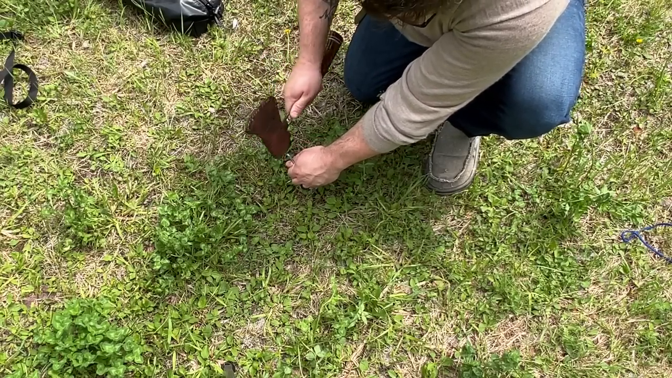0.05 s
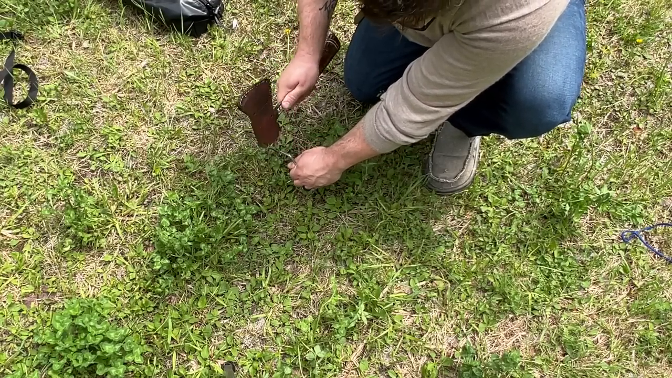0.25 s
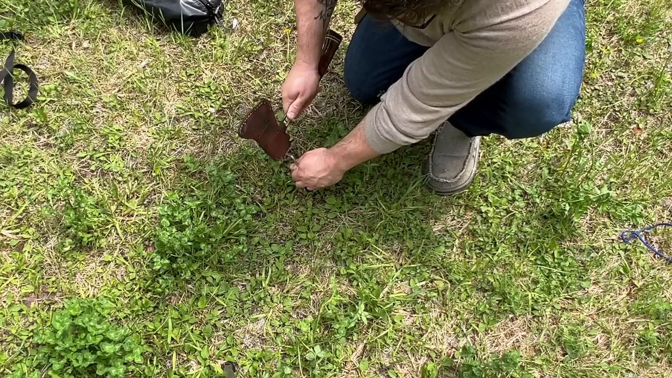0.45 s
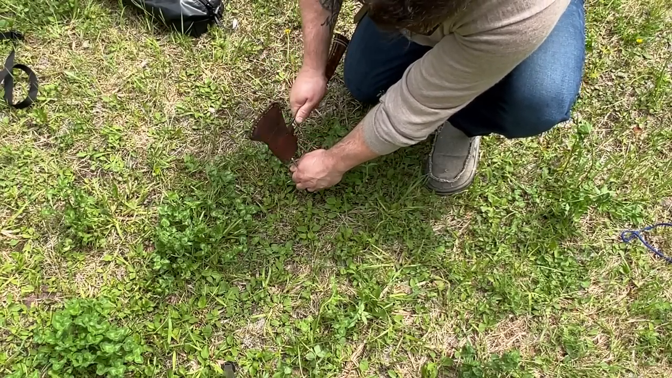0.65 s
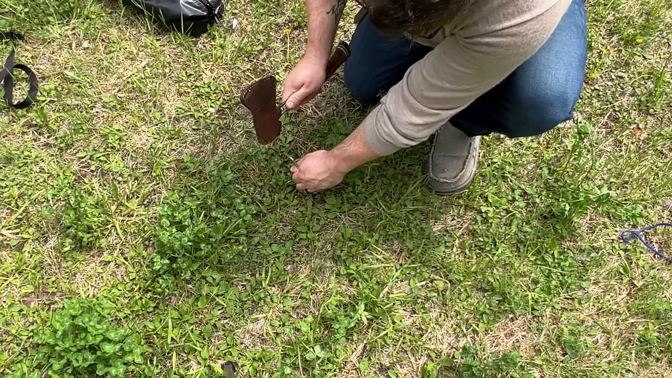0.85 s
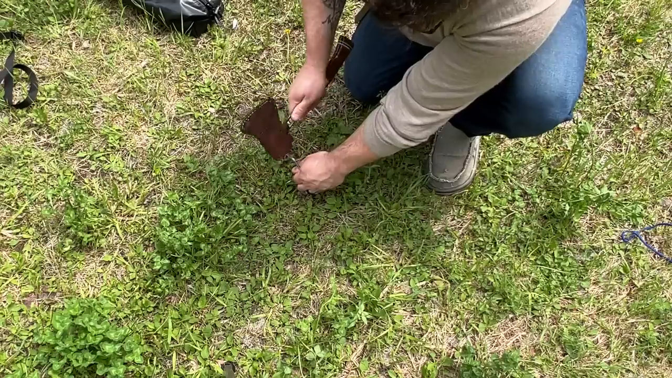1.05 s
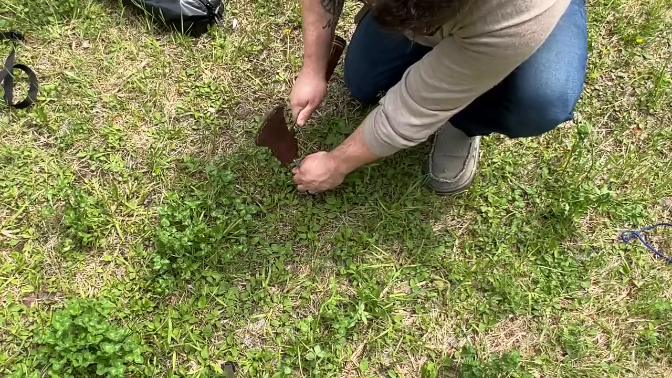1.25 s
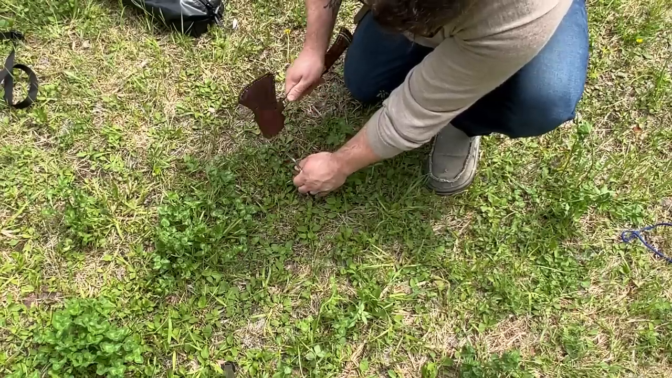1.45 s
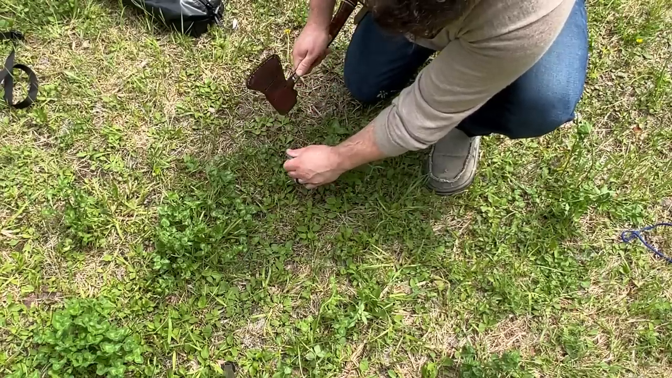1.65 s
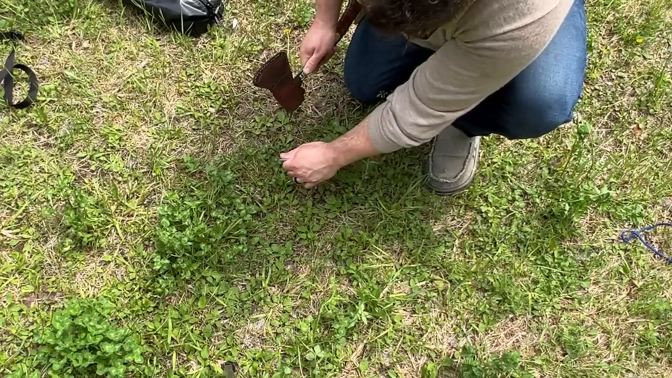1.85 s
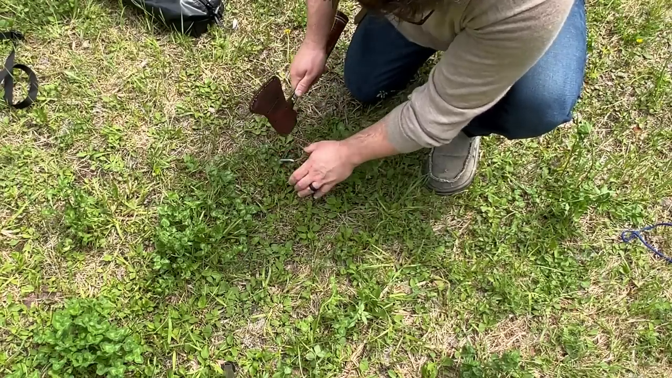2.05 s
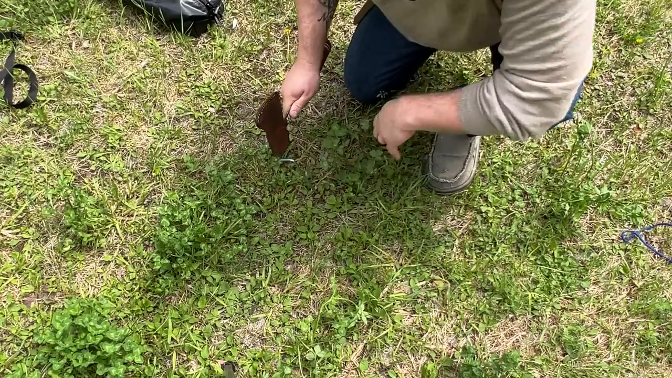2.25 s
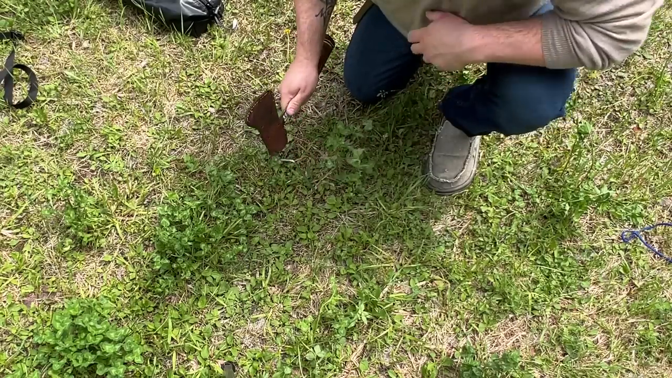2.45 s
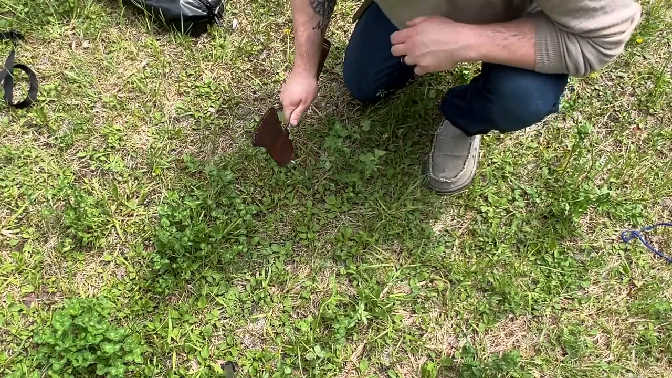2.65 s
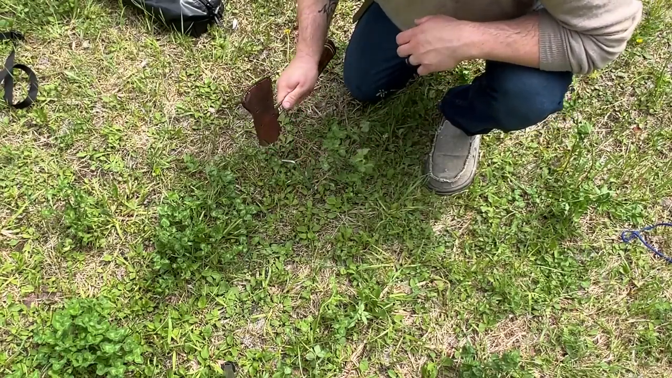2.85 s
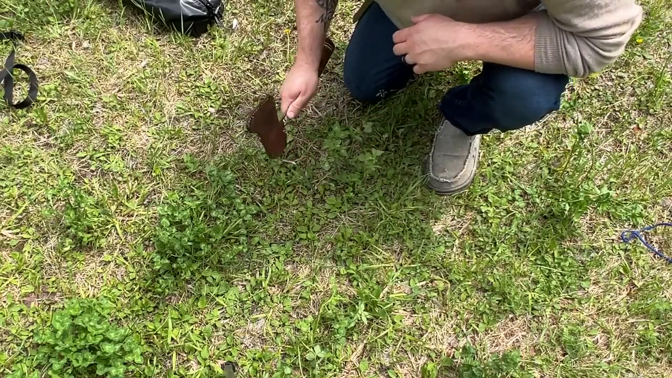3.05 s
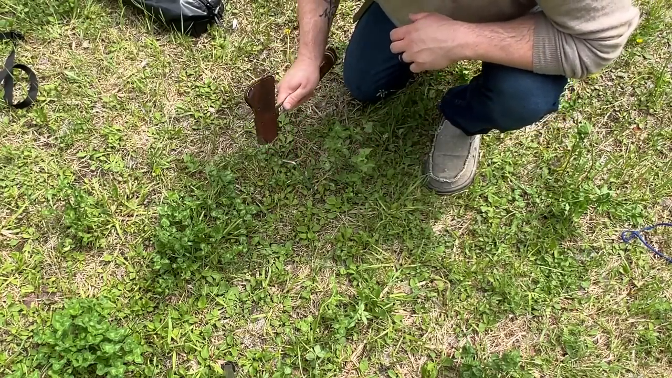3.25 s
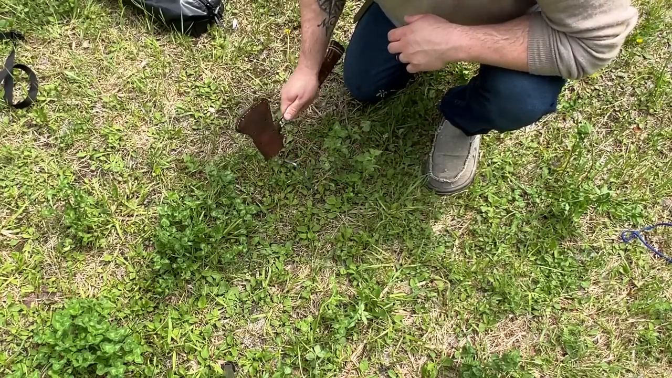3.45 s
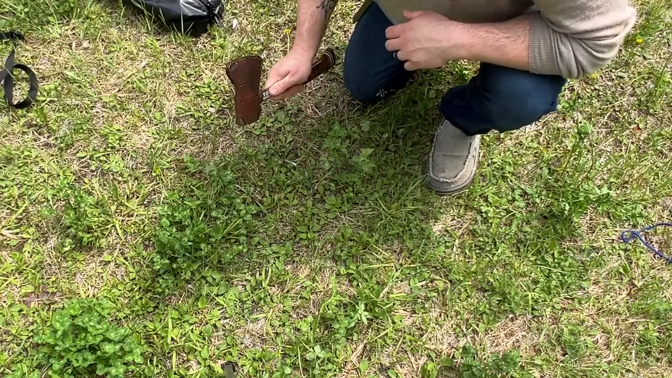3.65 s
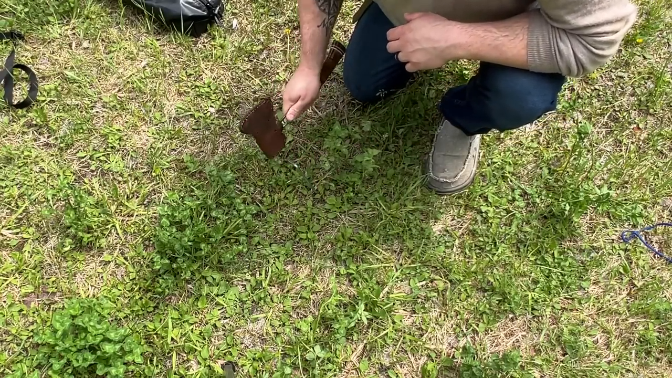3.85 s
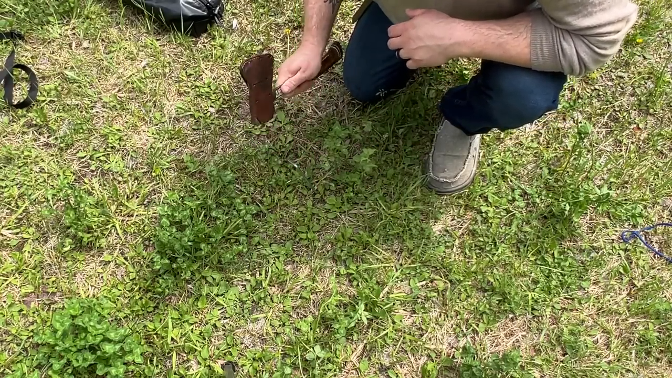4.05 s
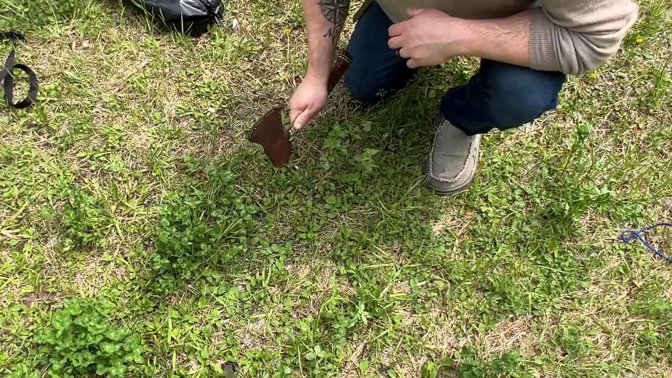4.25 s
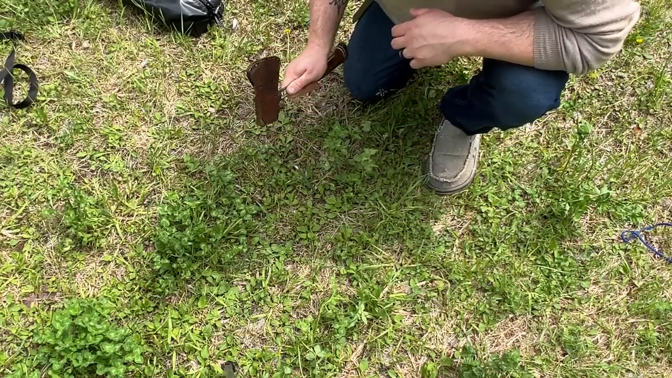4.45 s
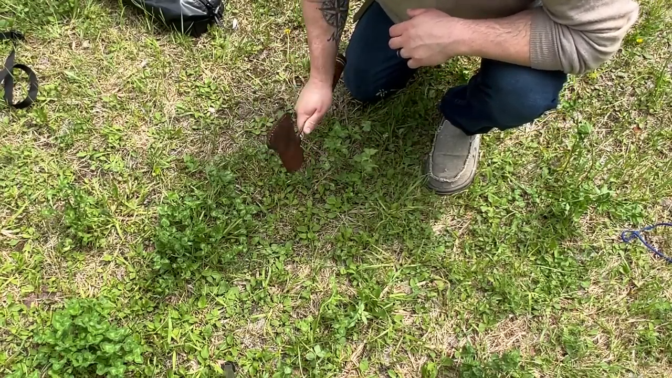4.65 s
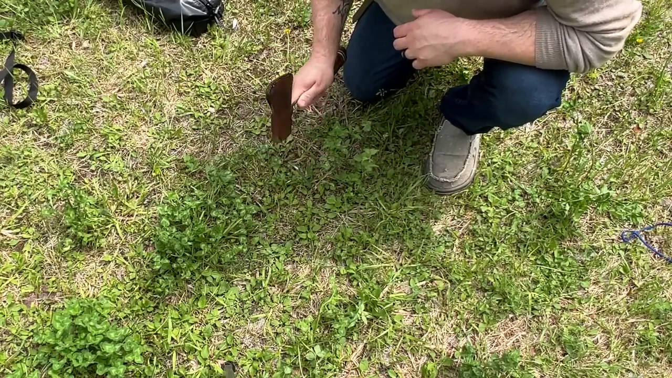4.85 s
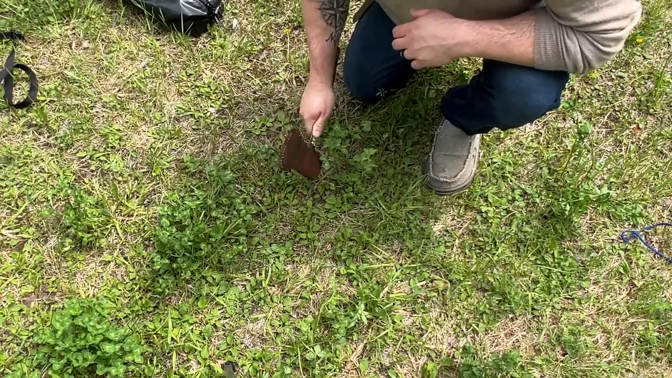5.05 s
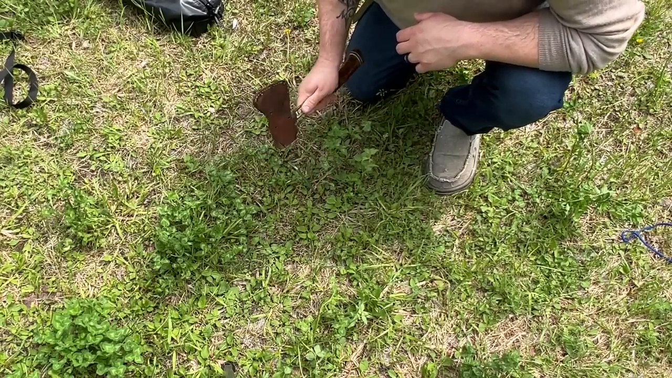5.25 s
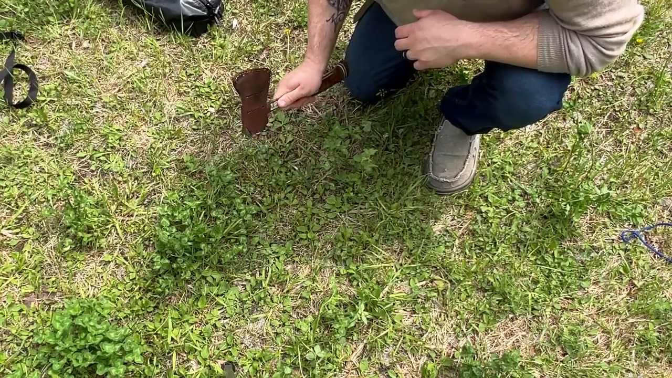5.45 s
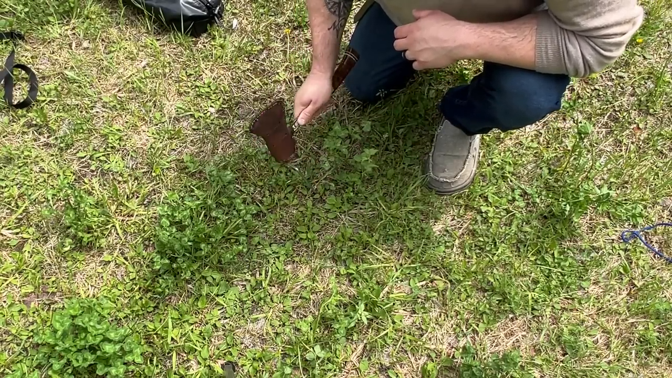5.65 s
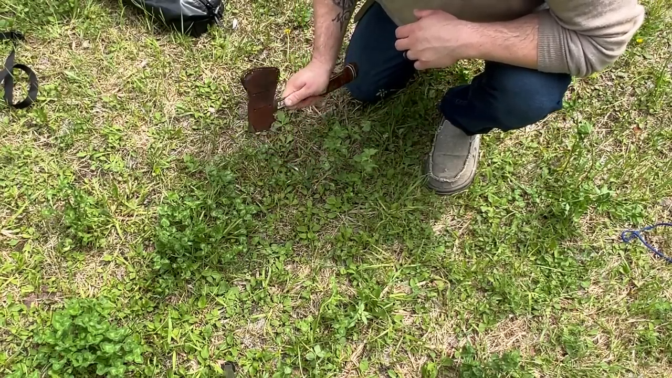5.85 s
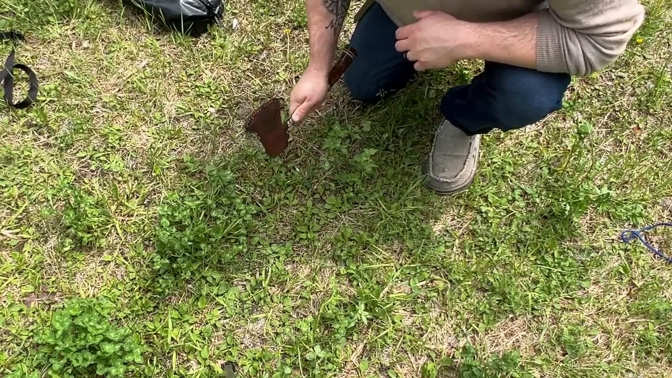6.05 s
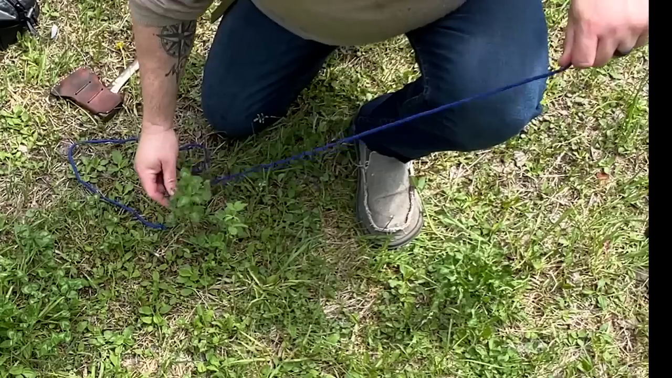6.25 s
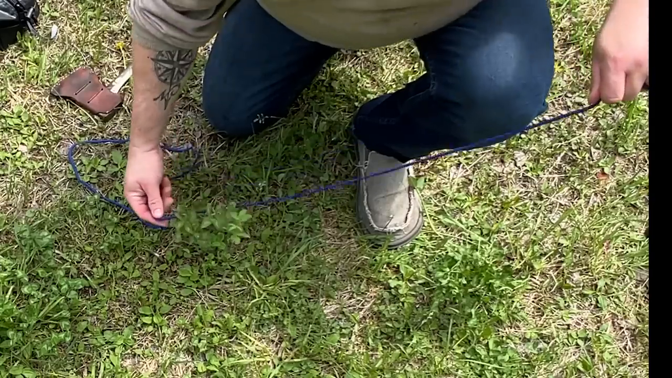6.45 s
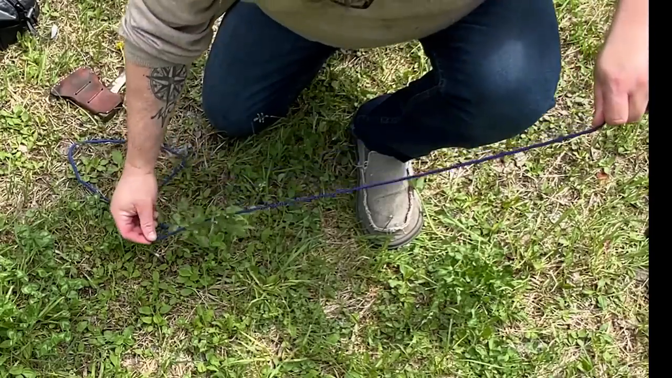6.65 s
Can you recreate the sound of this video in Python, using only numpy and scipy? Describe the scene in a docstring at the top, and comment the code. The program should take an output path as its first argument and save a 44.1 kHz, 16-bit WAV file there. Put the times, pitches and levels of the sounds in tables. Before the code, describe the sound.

A hatchet hammers a metal tent stake into a lawn with sharp clanks and thuds, over wind rumble and a distant whistling bird.

```python
"""Over open air and a gusty breeze rumbling on the microphone, a hatchet drives a metal tent stake into a lawn.
Five blows land while a far bird whistles: each a short clank of chattering steel and a falling thud from the
soil, with a faint wash from the campsite. In a pause the hand lets go of the stake, the bird calls again and a
sleeve brushes past. Ten more blows follow, firmer as the stake sinks; once the hatchet drops back with a tiny
tick. After the last blow the background suddenly turns duller."""
import sys
import numpy as np
from scipy import signal
from scipy.fft import rfft, irfft, next_fast_len
from scipy.io import wavfile
from scipy.ndimage import uniform_filter1d

SR = 44100
rng = np.random.default_rng(int(sys.argv[2]) if len(sys.argv) > 2 else 0)


def int16_out(signal):
    """Quantize to a 16-bit WAV file."""
    q = np.round(np.clip(np.atleast_2d(signal).T, -1, 1) * 32767)
    wavfile.write(sys.argv[1], SR, q.astype(np.int16))


N = 295470
TIME = np.arange(N) / SR
BLOW_TIME = TIME[:2400]


def from_db(db):
    """Decibels to gain."""
    return 10 ** (np.asarray(db) / 20)


def rms_one(x):
    """Scale to rms 1."""
    return x / np.sqrt(np.mean(x ** 2) + 1e-20)


def at_level(x, db):
    """Give each short sound the energy of 10 ms at this level; a stereo pair is scaled as one."""
    energy = np.sum(x ** 2, axis=-1, keepdims=True)
    energy = energy.mean(axis=0) if x.ndim > 1 else energy
    return x * from_db(db) * np.sqrt(SR / 100 / (energy + 1e-20))


def at_hz(points, hz, column=1):
    """Read a table on a log-frequency axis."""
    points = np.array(points)
    return np.interp(np.log(hz), np.log(points[:, 0]), points[:, column])


def band(x, low, high):
    """Causal band-pass, edges in Hz."""
    edges = [max(low, 10), min(high, .48 * SR)]
    return signal.sosfilt(signal.butter(2, edges, "band", fs=SR, output="sos"), x)


def resonate(x, hz, width):
    """Two-pole resonance, gain 1 at its peak."""
    r = np.exp(-np.pi * width / SR)
    feedback = [1, -2 * r * np.cos(2 * np.pi * hz / SR), r * r]
    return signal.lfilter((1 - r * r) / 2 * np.array([1, 0, -1]), feedback, x)


def stereo(pair, correlation):
    """Mix two unrelated sounds as mid and side into left and right of a given correlation."""
    mid, side = np.sqrt(1 + correlation) * pair[0], np.sqrt(1 - correlation) * pair[1]
    return np.array([mid + side, mid - side])


# Stereo image of air, wind and wash, narrow lows and wide highs: f/Hz, left-right correlation
AIR_CORRELATION = [(60, .85), (290, 0.92), (640, 0.48), (1400, 0), (7000, 0.078)]

def steady_noise(colour, size=N):
    """A stereo noise bed of a given colour, rms 1."""
    padded = next_fast_len(size, real=True)
    hz = np.fft.rfftfreq(padded, 1 / SR) + 1
    white = stereo(rfft(rng.standard_normal((2, padded))), at_hz(AIR_CORRELATION, hz))
    coloured = white * from_db(at_hz(colour, hz)) * (hz > colour[0][0])
    return rms_one(irfft(coloured, padded)[:, :size])


# EQ of the open air, and of the duller background after the change near the end: f/Hz, level/dB
OPEN_AIR_EQ = [(100, 13), (200, 3), (300, 5), (430, -6.5), (700, -8), (1100, -7.5), (1700, -7),
               (2600, -11.5), (3800, -10.5), (5300, -7), (6700, -9), (8000, -17.5), (10000, -31.5),
               (12000, -28), (15000, -47.5)]
DULL_AIR_EQ = [(100, 11), (300, 0.5), (450, -7.5), (800, -12.5), (1600, -8), (2500, -11), (3500, -20.5),
               (4700, -19), (6000, -15), (7500, -27), (10000, -36), (12000, -27), (15000, -47.5)]

def air(dull_from_s=6.245):
    """Distant hum and a hiss of foliage, stronger on the left; near the end the background suddenly turns
    duller."""
    change = round(dull_from_s * SR)
    early = from_db(-63.5) * steady_noise(OPEN_AIR_EQ, size=change)
    late = from_db(-64) * steady_noise(DULL_AIR_EQ, size=N - change)
    bed = np.hstack([early, late])
    hum = signal.lfilter(*signal.butter(1, 700, fs=SR), bed)
    hiss = bed - hum
    return hum * from_db([[.7], [-.7]]) + hiss * from_db([[2.6], [-3.2]])


# EQ of the wind rumble: f/Hz, level/dB
WIND_EQ = [(15, -38.5), (25, -14), (45, -2.5), (75, 8), (110, -4.5), (160, -10), (230, -23), (330, -45.5),
           (700, -88.5)]
# Gusts: t/s, half length/s, peak level/dB
GUSTS = [(0.137, 0.022, -40.5), (0.249, 0.054, -44), (1.457, 0.015, -40), (1.583, 0.024, -35),
         (1.699, 0.079, -34.5), (2.232, .016, -52), (2.509, 0.051, -48.5), (2.87, 0.018, -46),
         (4.903, .016, -47), (5.217, 0.015, -47.5), (5.425, 0.024, -45), (6.114, .018, -43.5)]

def wind(breeze_db=-55.5, breeze_db_per_s=-.66, plain_gust_db=-34.5, octaves_per_db=.025):
    """An easing breeze rumbles on the microphone; gusts swell on top, the weaker ones darker."""
    out = from_db(breeze_db + breeze_db_per_s * TIME) * steady_noise(WIND_EQ)
    for s, half_s, db in GUSTS:
        on = np.abs(TIME - s) < .25
        swell = np.exp(-((TIME[on] - s) / half_s) ** 2)
        stretch = 2 ** (octaves_per_db * (db - plain_gust_db))
        colour = [(hz * stretch, level) for hz, level in WIND_EQ]
        eddies = steady_noise(colour, size=SR)[:, :len(swell)]
        out[:, on] += from_db(db) * rms_one(eddies * swell) * np.sqrt(np.mean(swell ** 2))
    return out * from_db([[.6], [-.6]])


# Reverb from trees and tents: f/Hz, level/dB relative to the send, t60/s
WASH = [(99.3, -9, 0.33), (296, -13.5, 0.15), (800, -20, 0.26), (2480, -25, 0.47), (4460, -22.5, 0.56),
        (6900, -17.5, 0.48), (8960, -20, 0.25), (10395, -29, 0.45), (12600, -26, 0.26), (16000, -22, .2)]

def campsite(send, echo_s=.0195, echo_db=-23, build_s=.0073):
    """One near reflection, then a thin wash scattered back from all around."""
    t = TIME[:SR // 2]
    white = rng.standard_normal((2, 2, len(t)))
    build = (1 - .5 * np.exp(-t / build_s)) * (t > .004)
    wash, edges = 0, np.geomspace(80, 17000, 21)
    for k, (low, high) in enumerate(zip(edges, edges[1:])):
        hz = np.sqrt(low * high)
        noise = stereo(band(white[k % 2], low, high), at_hz(AIR_CORRELATION, hz))
        fade = build * from_db(-60 * t / at_hz(WASH, hz, column=2))
        wash = wash + noise * fade / np.sqrt(2 * np.sum(fade ** 2)) * from_db(at_hz(WASH, hz))
    echo = band(np.arange(len(t)) == round(echo_s * SR), 1500, 7500)
    return signal.oaconvolve(send, wash + from_db(echo_db) * echo, axes=1)[:, :N]


# Bird whistles: t/s, rise/s, hold/s, fall/s, level/dB before the bird's fader
WHISTLES = [(0.171, 0.0075, 0.046, 0, -62), (0.28, 0.043, 0.043, 0.0037, -60.5),
            (0.451, 0.0029, .058, 0.11, -59.5), (0.834, 0.01, 0.066, 0.094, -60.5),
            (1.927, 0.0058, 0, 0.049, -67.5), (2.005, 0.059, 0.0018, 0, -71.5),
            (2.145, .045, 0.024, 0.0092, -69)]

def bird(held_hz=3570, lowest_hz=2685, fade_s=.018, waver=.011, flutter_db=4.0, db_per_hz=-.0095):
    """Thin far whistles slur up to a held note or drop from it, fluttering on their way through the air."""
    rise_hz_per_s, sag_hz_per_s, fall_hz_per_s = 9000, 680, 20000
    out = np.zeros(N)
    wobble, flutter = rms_one(uniform_filter1d(rng.standard_normal((2, N)), size=300))
    for s, rise_s, hold_s, fall_s, db in WHISTLES:
        length = rise_s + hold_s + fall_s
        on = (TIME > s) & (TIME < s + length)
        t = TIME[on] - s
        scoop = rise_hz_per_s * np.maximum(rise_s - t, 0)
        drop = fall_hz_per_s * np.maximum(t - rise_s - hold_s, 0)
        hz = np.maximum(held_hz - sag_hz_per_s * t - scoop - drop, lowest_hz)
        phase = 2 * np.pi * np.cumsum(hz * (1 + waver * wobble[on])) / SR
        swell = np.minimum(np.minimum(t, length - t) / fade_s, 1)
        gain = from_db(db + db_per_hz * (held_hz - hz) + flutter_db * flutter[on])   # lower is softer
        out[on] += np.sqrt(2) * np.sin(phase) * swell * gain
    return out * from_db([[1.5], [-1.5]])


def sleeve(at_s=2.195, half_s=.023, db=-71):
    """Cloth brushes softly as the arm is drawn back."""
    cloth = rms_one(band(rng.standard_normal((2, N)), 2500, 11000))
    return from_db(db) * cloth * np.exp(-((TIME - at_s) / half_s) ** 2)


def rebound(at_s=3.376, db=-54, decay_s=.0016):
    """The hatchet drops back on the stake with one tiny tick."""
    t = np.maximum(TIME - at_s, 0)
    envelope = np.exp(-t / decay_s) * (t > 0) + 1e-12
    return at_level(band(rng.standard_normal((2, N)) * envelope, 4500, 15000), db)


# Ring-out of the hatchet head: f/Hz, width/Hz, level/dB relative to the clink column, t60/s
HEAD_MODES = [(6590, 180, -23, 0.36), (12650, 1100, -32.5, 0.24), (15550, 300, -35.5, .25)]

def head_ring():
    """Clusters of close modes in the hatchet head shimmer on faintly after each blow."""
    t, out = TIME[:SR // 2], np.zeros((2, N + SR))
    for hz, width, db, t60 in HEAD_MODES:
        white = rng.standard_normal((2, len(BLOWS), len(t)))
        ring = rms_one(band(white, hz - width / 2, hz + width / 2)) * from_db(db - 60 * t / t60)
        for k, (s, _, _, _, clink_db, *_) in enumerate(BLOWS):
            start = round(s * SR)
            out[:, start:start + len(t)] += from_db(clink_db) * ring[:, k]
    return out[:, :N]


def soil(thud_db, deep_db, depth, start_hz=1400, slowing=.5, deep_s=.0155):
    """The ground carries highs faster than lows, so the thud sweeps down; the turf knocks along."""
    # the soil firms as depth goes from 0 to 1: a quicker thud, a higher knock
    thud_s = np.interp(depth, [0, 1], [.0051, .0042])
    knock_hz = np.interp(depth, [0, 1], [290, 334.5])
    t = BLOW_TIME
    hz = 1 / (1 / start_hz + slowing * (1 + rng.normal(0, .044)) * t)
    sweep = np.cos(2 * np.pi * (np.cumsum(hz) / SR - .12))
    thud = sweep * (t / thud_s) ** 5 * np.exp(-5 * t / thud_s)
    deep = sweep * (t / deep_s) ** 8 * np.exp(-8 * t / deep_s)
    crumble = rng.standard_normal(len(t)) * np.abs(thud)   # grains of soil give way
    knock = resonate(resonate(crumble, knock_hz, width=80), hz=380, width=220)
    body = at_level(thud, thud_db - .8) + at_level(knock, thud_db - 5.5) + at_level(deep, deep_db - 1)
    return body * from_db([[.5], [-.5]])


def chatter(rise_s, decay_s):
    """Steel chatters on steel for a few milliseconds: a pair of noisy forces for every blow."""
    envelope = (1 - np.exp(-(BLOW_TIME / rise_s) ** 2)) * np.exp(-BLOW_TIME / decay_s)
    return rng.standard_normal((2, len(BLOWS), len(BLOW_TIME))) * envelope


# Stereo image of the clank: f/Hz, left-right correlation
CLANK_CORRELATION = [(1200, 0.97), (3000, 0.82), (5000, 0.91), (6500, 0.019), (12000, 0.061)]
# Pan of the clank: f/Hz, left minus right/dB
CLANK_PAN = [(400, 0.5), (1200, 2.5), (3000, 2), (4500, 5), (6500, 4.5), (8500, -1.5), (12000, 0.1)]

def place_clank(pair, hz):
    """Give one frequency region of the clank its width and pan."""
    left, right = stereo(pair, at_hz(CLANK_CORRELATION, hz))
    lean = from_db(at_hz(CLANK_PAN, hz) / 2)
    return np.array([left * lean, right / lean])


# EQ of the contact crack: f/Hz, level/dB
CRACK_EQ = [(600, -6), (1100, 5), (1900, -4.5), (3000, 0), (4800, -1), (7800, -4), (10000, -5.5),
            (13500, -8), (16000, -8)]

def contact_cracks():
    """The broadband attack of every blow: the chatter itself, shaped in seven bands."""
    forces = [chatter(rise_s=.0014, decay_s=.002) for _ in range(2)]
    cracks, edges = 0, np.geomspace(600, 16000, 8)
    for k, (low, high) in enumerate(zip(edges, edges[1:])):
        hz = np.sqrt(low * high)
        cracks = cracks + from_db(at_hz(CRACK_EQ, hz)) * place_clank(band(forces[k % 2], low, high), hz)
    return at_level(cracks, db=-1)


def steel_mode(force, hz, width, db, skirt=.22):
    """One briefly ringing mode of the steel; a second, broad resonance keeps its flanks dark."""
    ring = resonate(resonate(force, hz, width), hz, hz * skirt)
    return at_level(place_clank(ring, hz), db)


# Steel modes that every blow rings: f/Hz, width/Hz, level/dB relative to the steel column
STEEL_MODES = [(1586, 150, -13.5), (2700, 200, -14), (4192, 270, -6.5), (6000, 1300, -2),
               (15600, 200, -13.5)]
# Hatchet blows, each landing a little differently: t/s, first bend f/Hz, then level/dB before each
# layer's trim for first bend, second bend, clink, crack, steel, sizzle, thud, deep thud
BLOWS = [(0.0851, 2330, -30, -30.5, -29.5, -27, -29.5, -30.5, -34.5, -48),
         (0.3744, 2360, -33.5, -30, -28, -26, -29.5, -30, -36.5, -38),
         (0.67, 2420, -32, -35.5, -25.5, -28, -25, -28.5, -35, -35.5),
         (0.9628, 2400, -32.5, -31, -26.5, -25.5, -22.5, -31, -34, -27),
         (1.2773, 2480, -20.5, -29.5, -24, -26, -23, -32.5, -27.5, -31),
         (2.338, 2440, -28.5, -34.5, -32, -35, -32.5, -49, -48.5, -36),
         (2.6462, 2510, -23.5, -33, -25.5, -31, -31, -32.5, -38, -33),
         (2.975, 2600, -23, -32, -25, -29.5, -24.5, -34, -35, -32.5),
         (3.3457, 2824, -32, -32.5, -28.5, -27.5, -35, -34.5, -32.5, -31.5),
         (3.788, 2700, -38.5, -44.5, -18.5, -27.5, -36, -44, -29.5, -30),
         (4.215, 2410, -25.5, -26, -25.5, -28, -22.5, -39, -30, -28),
         (4.6312, 2216, -26.5, -23, -23.5, -28.5, -28.5, -26, -26, -26),
         (5.0256, 2155, -30, -24.5, -21.5, -25.5, -31, -43, -22.5, -32),
         (5.583, 2290, -27.5, -31.5, -25, -26.5, -25, -31.5, -24.5, -25),
         (5.9694, 2280, -34.5, -36.5, -19.5, -26.5, -28.5, -60.5, -23.5, -27)]

def blows(blur=1, let_go_s=2, gripped_hz=3130, free_hz=3370, right_lag_s=.000036):
    """The chatter rings the stake's damped, shifting modes (blur widens them); the soil thuds below."""
    out = np.zeros((2, N + len(BLOW_TIME)))
    cracks = contact_cracks()
    force = chatter(rise_s=.00085, decay_s=.0027)
    steel = sum(steel_mode(force, hz, width * blur, db) for hz, width, db in STEEL_MODES)
    sizzles = at_level(band(chatter(rise_s=.00055, decay_s=.0043), 14300, 19000), db=-1.5)
    drives = [chatter(.00058, .0029), chatter(.00049, .0032),   # first bend, second bend
              chatter(.0011, .0025), chatter(.00017, .0019)]    # clink, ping
    *_, mean_clink_db, _, _, mean_sizzle_db, _, _ = np.mean(BLOWS, axis=0)
    for k, (s, bend_hz, *levels) in enumerate(BLOWS):
        bend_db, second_db, clink_db, crack_db, steel_db, sizzle_db, thud_db, deep_db = levels
        blow = from_db(crack_db) * cracks[:, k] + from_db(steel_db) * steel[:, k]
        blow += from_db(sizzle_db) * sizzles[:, k]
        blow += soil(thud_db, deep_db, depth=k / (len(BLOWS) - 1))
        second_hz = gripped_hz if s < let_go_s else free_hz   # the hand's grip lowers the second bend
        ping_hz = 12260 + 29.5 * (sizzle_db - mean_sizzle_db)   # a harder contact pings higher
        ping_db = -27.5 + .87 * (clink_db - mean_clink_db)
        # f/Hz, width/Hz, level/dB
        modes = [(bend_hz, 160, bend_db), (second_hz, 290, second_db),
                 (6470, 490, clink_db), (ping_hz, 300, ping_db)]
        for (hz, width, db), drive in zip(modes, drives):
            blow += steel_mode(drive[:, k], hz, width * blur, db + .55)
        start = round(s * SR)
        out[:, start:start + len(BLOW_TIME)] += blow
    out[1] = np.roll(out[1], round(right_lag_s * SR))   # the sound reaches the left first
    return out[:, :N]


def scene(bird_db=-6, bird_send=5):
    """Blows and bird sound through the campsite, over air and wind."""
    whistles = from_db(bird_db) * bird()
    # the steel radiates differently in every direction, so the surroundings send back a blurred clank
    wash = campsite(blows(blur=3.1) + bird_send * whistles)
    return blows() + head_ring() + whistles + wash + sleeve() + air() + wind() + rebound()


def record(dry, ceiling=.97, cutoff_hz=16100):
    """Soft clipping rounds the peaks; a steep low-pass cuts the top."""
    rounded = ceiling * np.tanh(dry / ceiling)
    return signal.sosfilt(signal.ellip(10, .1, 80, cutoff_hz, fs=SR, output="sos"), rounded)


dry = scene()
out = record(dry)
int16_out(out)
```